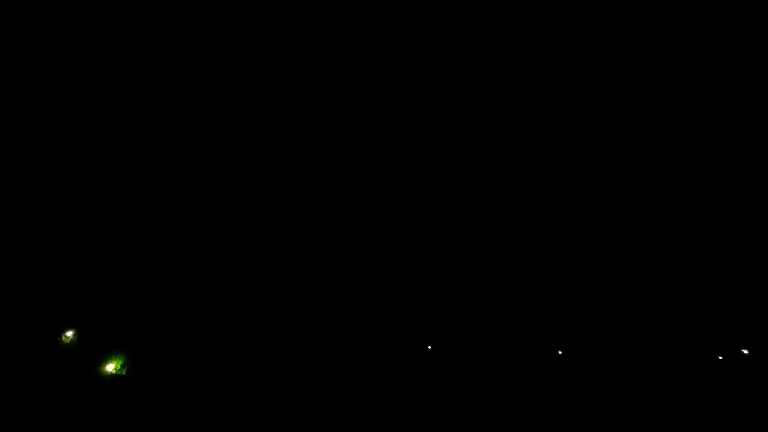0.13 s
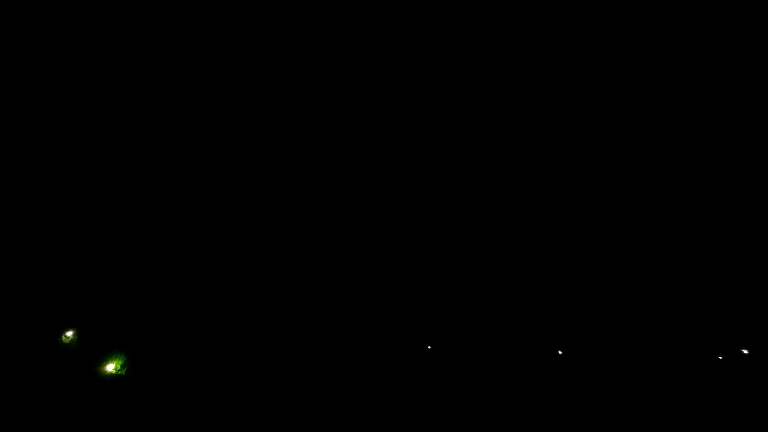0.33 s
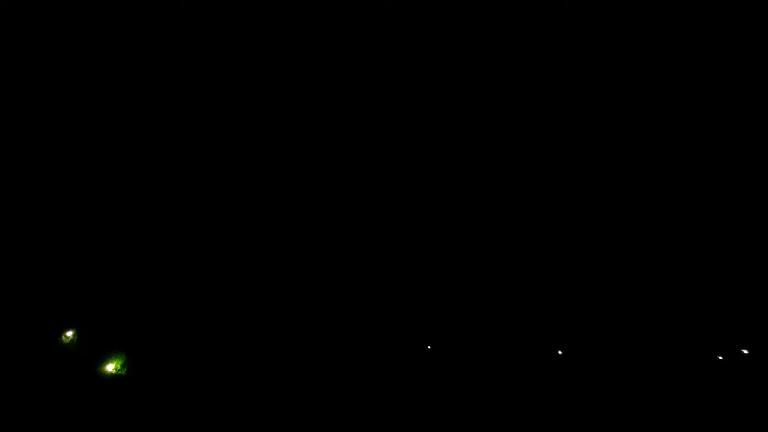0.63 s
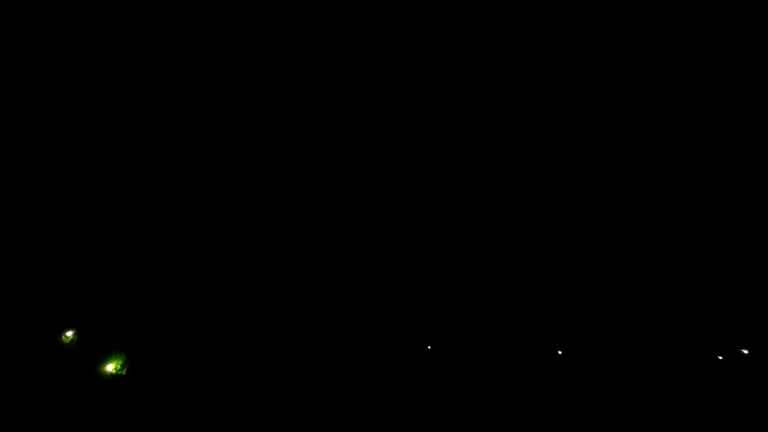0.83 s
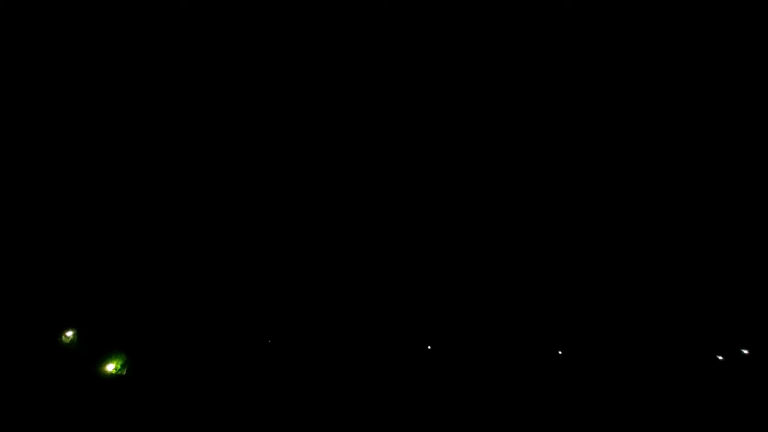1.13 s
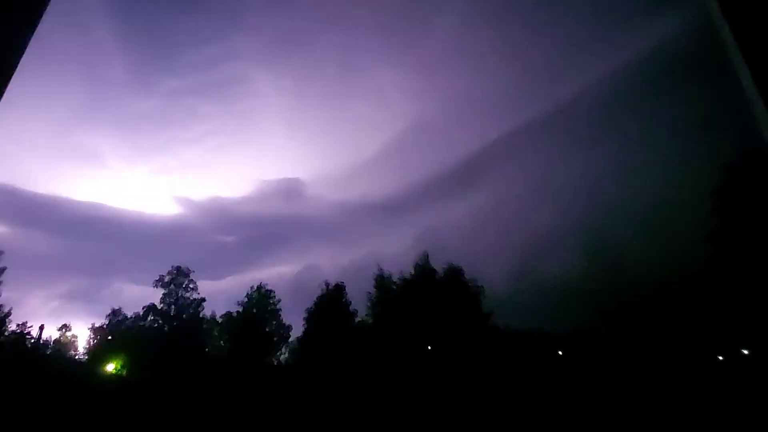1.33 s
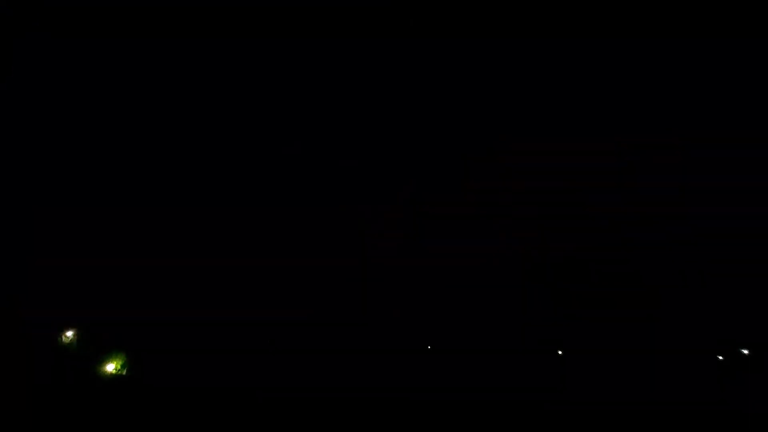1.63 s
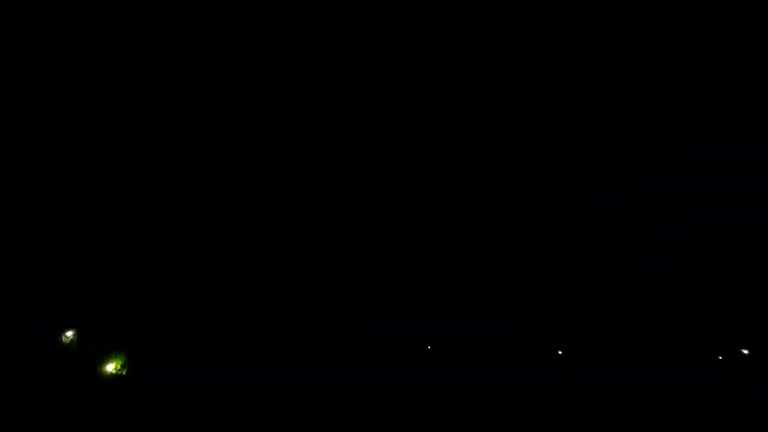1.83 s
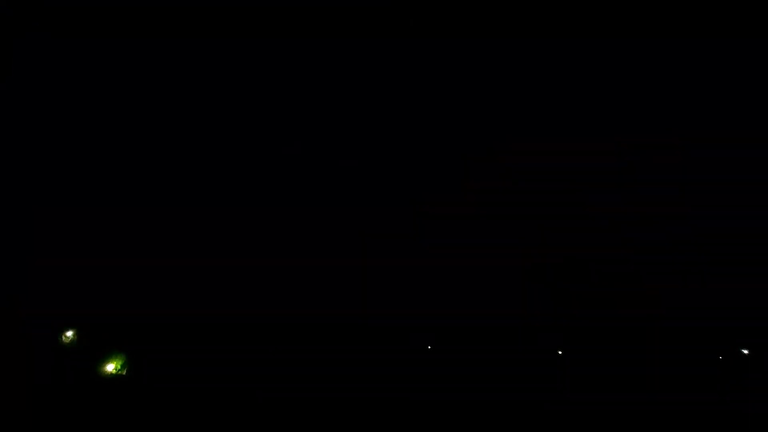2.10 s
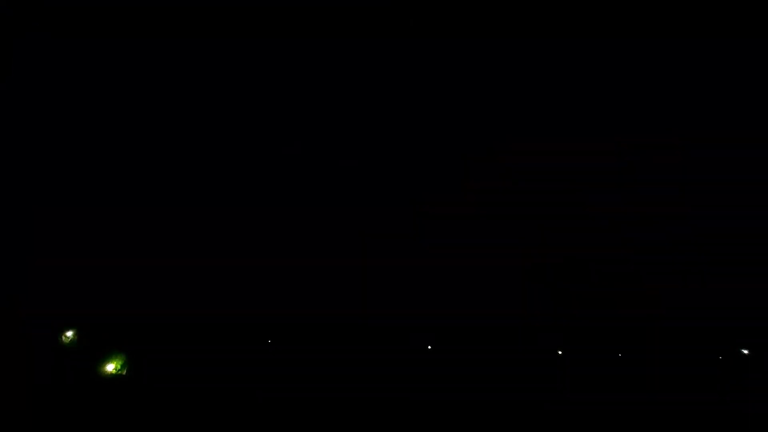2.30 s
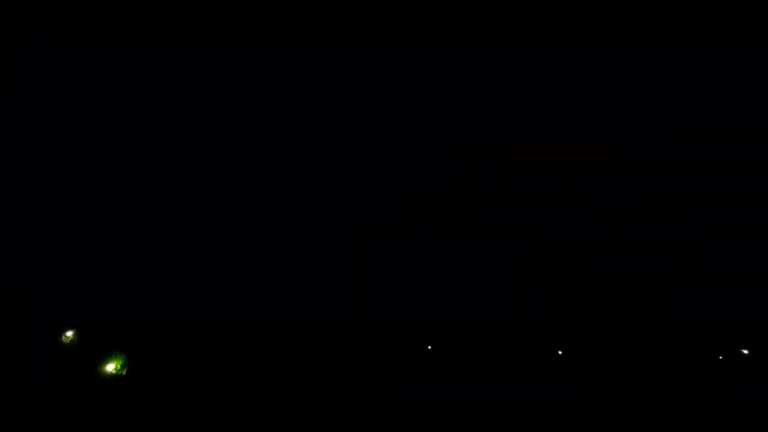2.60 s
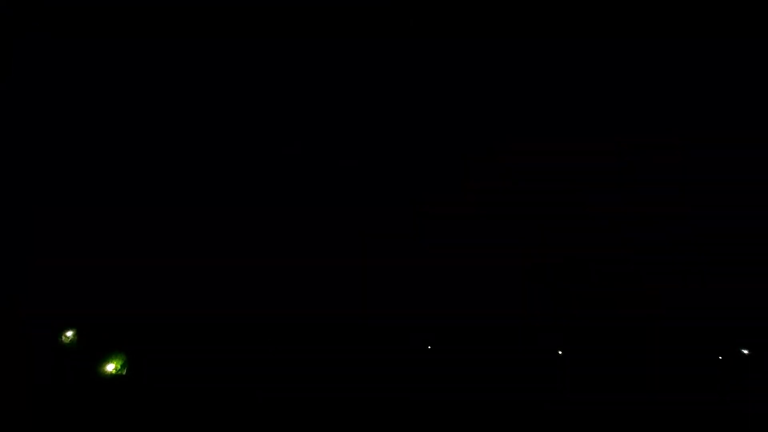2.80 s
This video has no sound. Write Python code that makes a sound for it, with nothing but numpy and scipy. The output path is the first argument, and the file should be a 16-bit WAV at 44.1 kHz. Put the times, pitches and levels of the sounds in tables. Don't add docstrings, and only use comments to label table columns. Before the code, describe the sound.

Loud low thunder rumbling and thudding in uneven bursts outdoors at night, with faint distant rain

```python
import sys
import numpy as np
from scipy import signal
from scipy.fft import rfft, irfft, next_fast_len
from scipy.io import wavfile
from scipy.ndimage import uniform_filter1d

SR = 44100
rng = np.random.default_rng(int(sys.argv[2]) if len(sys.argv) > 2 else 0)


def makeup_ratio(level_db):
    decades = np.asarray(level_db, float) / 20
    return 10 ** decades


def unload_wav(signal):
    wavfile.write(
        sys.argv[1],
        SR,
        np.round(np.clip(np.atleast_2d(signal).T, -1, 1) * 32767).astype(np.int16),
    )


N = 130095
T_S = np.arange(N) / SR
PAD = next_fast_len(N + SR)
HZ = np.arange(PAD // 2 + 1) * SR / PAD + 1e-3

# [start_s, long_db, short_re_long_db, deep_re_long_db]
ROLL_ROWS = [(0.0, -49.5, 11.5, -8.5), (0.12, -30, 2.5, 1.5), (0.27, -29.5, 6.5, -9.5), (0.38, -29, 7, 3.5),
             (0.72, -23.5, 0.5, 1), (1.17, -26, -1, -17.5), (1.28, -29.5, -4.5, -14.5),
             (1.54, -33.5, 3.5, -5.5), (1.81, -28, -5, -27), (2.32, -25, -7, -10), (2.95, -31.5, -1, 0.5)]
# [start_s, peak_db, short_share_db, deep_share_db]
CLAP_ROWS = [(0.059, -25.5, -11, -13.5), (0.124, -18.5, -0.5, -14), (0.202, -10.5, -10.5, -13.5),
             (0.316, -13, -3, -15), (0.369, -18.5, -17.5, -19), (0.452, -24, 4, -15.5),
             (0.543, -1, -1.5, -35.5), (0.702, 3, -4.5, -23), (0.816, -1, -11, -14.5),
             (0.869, -7.5, -18.5, -15), (0.946, -8.5, -16, -27), (1.003, -11, -8, -33.5),
             (1.129, -14.5, -17, -19.5), (1.207, -18, -5.5, -23), (1.274, -19.5, 0.5, -22.5),
             (1.587, -3.5, -9, -19.5), (1.607, -1, -7.5, -29.5), (1.806, -7, -27, -28.5),
             (1.842, -9, -31.5, -26.5), (1.943, -11, -13, -20), (1.99, -6, -8, -26), (2.105, 0, -10, -24.5),
             (2.244, -12, -15, -18.5), (2.297, -17.5, -19.5, -20), (2.384, -5.5, -27, -21),
             (2.672, -11.5, -7.5, -25), (2.737, -15, -5.5, -27.5), (2.873, -14, -18.5, -32),
             (2.914, -11.5, -24, -20.5)]
# [start_s, peak_db, short_share_db, deep_share_db]
PEAL_ROWS = [(0.604, -5, 2, -12), (0.634, -8.5, 1.5, -17), (0.721, -2.5, -13.5, -23),
             (1.624, -10.5, -20.5, -11), (1.678, -6, -11.5, -22.5), (1.724, -12, -9.5, -23.5),
             (2.012, 0.5, -21, -24), (2.044, -15.5, -19, -29.5), (2.129, -5, -21, -20),
             (2.409, -12.5, -10, -19), (2.476, -8.5, -24.5, -23)]
# [freq_hz, density_db]
LONG_COLOUR = [(30, -61), (80, -16.5), (120, -6), (180, -3.5), (235, -4.5), (330, -31), (600, -50.5),
               (3000, -130)]
# [freq_hz, density_db]
SHORT_COLOUR = [(150, -31.5), (235, -21.5), (275, -4.5), (325, 0), (390, -11.5), (450, -24.5), (700, -42.5),
                (3000, -130)]
# [freq_hz, density_db]
DEEP_COLOUR = [(15, -19), (30, -8.5), (60, -5.5), (95, 4.5), (125, 11), (170, -35), (400, -72),
               (2000, -140)]
# [pitch_hz, width_hz, gain_db]
PORCH_MODES = [(85.2, 11, -5.5), (135, 5.3, 4), (155, 6.7, 9.5), (190.6, 5.7, 10.5), (285.8, 6.5, 10),
               (323.5, 5.3, 9), (373.3, 14, 6), (501, 12, 6), (618.7, 30, 3.5), (788, 13, 3.5),
               (995, 32, 6.5)]
# [freq_hz, level_db]
SCATTER_COLOUR = [(30, -12.5), (110, -52), (250, -17.5), (600, -0.5), (1300, -1.5), (3000, 9)]
# [freq_hz, density_db]
CRACKLE_COLOUR = [(250, -39), (420, -0.5), (520, 0), (700, -3), (900, -11), (1200, -22.5), (1600, -48),
                  (5000, -100)]
# [freq_hz, density_db]
EDGE_COLOUR = [(500, -43.5), (1000, -5), (1500, 1.5), (2000, -9), (2500, -20), (3200, -30.5), (8000, -83.5)]
# [time_s, gain_db]
NEARNESS_DB = [(0, -7.5), (.1, 1), (.25, 1.5), (.5, 3), (.65, 2.5), (.8, 0.5), (.95, -3), (1.3, -2),
               (1.47, 2), (1.62, -0.5), (1.85, -3), (2.05, -0.5), (2.3, -1), (2.5, -2), (2.95, -4.5)]
# [freq_hz, density_db]
RAIN_COLOUR = [(1500, -20), (2400, -3.5), (3300, -2.5), (4400, -1), (8800, -5), (9600, -8.5), (12300, -10),
               (15500, -14.5)]
# [freq_hz, density_db]
ROAR_COLOUR = [(71, -53), (120, -14), (327, 1), (452, -12), (1190, -15.5), (1280, -17.5), (2600, -38.5),
               (3380, -54.5), (5720, -120)]
# [time_s, gain_db]
AUTO_GAIN = [(0, 0.8), (.1, 3), (.3, 4.4), (.53, 4.2), (.6, 1.5), (.7, -2), (1.45, -1), (1.62, -3.5),
             (1.95, -1.5), (2.1, -2), (2.95, -2.5)]

ATTACK_S, RELEASE_S, CLAP_HOLD_S, PEAL_HOLD_S = 0.012, 0.012, 0.014, 0.045
STROKE_TRIM_DB, SHORT_TRIM_DB, DEEP_TRIM_DB = -8, 3, 8
WAVES_PER_S, WAVE_SPREAD_DB = 500, 1.02
EVENING_S, EVENING = 0.0286, 0.61
LEAD_DELAY_S, LEAD_DB, LEAD_CRACKLE_DB = 0.006953, 26.5, 26
SCATTER_S, RIGHT_LAG_S, LEFT_DB = 0.049, 0.00038, -0.78
CRACKLE_DB, CRACKLE_SMEAR_S, CRACKLE_FOLLOWS, CRACKLE_SHARED = -25, 0.014, 0.62, 0.9
EDGE_DB, EDGE_FOLLOWS, EDGE_NEARNESS = -45.5, 0.35, 2
RAIN_DB, PATCHY_DB, DROPS_PER_S, DROPS_DB = -56.5, 0.3, 1200, -19
INSECT_HZ, INSECT_WIDTH_HZ, INSECT_DB = 3086, 100, -68
INSECT_FADE_DB_PER_S, INSECT_THROB_DB = 1.8, 0.7
ROAR_DB = -51


def rms_one(x):
    return x / np.sqrt(np.mean(x ** 2) + 1e-20)


def curve(points):
    return np.interp(T_S, *np.transpose(points))


def colour(points):
    hz, db = np.transpose(points)
    return makeup_ratio(np.interp(np.log(HZ), np.log(hz), db))


def shaped(x, response):
    return irfft(rfft(x, PAD) * response, PAD)[..., :N]


def clicks(rate_per_s, spread_db):
    sizes = makeup_ratio(spread_db * np.minimum(rng.exponential(1, N), 4))
    sizes = sizes * rng.choice([-1, 1], N)
    return sizes * (rng.random(N) < rate_per_s / SR)


def evened(x):
    power = uniform_filter1d(rms_one(x) ** 2, int(EVENING_S * SR)) + 0.13
    return rms_one(x / power ** (EVENING / 2))


def drift(rate_hz):
    r = np.exp(-2 * np.pi * rate_hz * 40 / SR)
    noise = rng.standard_normal(N // 40 + 2002)
    slow = signal.lfilter([1], [1, -2 * r, r * r], noise)[2000:]
    return np.interp(np.arange(N) / 40, np.arange(len(slow)), rms_one(slow))


def wave_strength():
    start_s, level_db, short_db, deep_db = np.transpose(ROLL_ROWS)
    power = np.array([makeup_ratio(2 * np.interp(T_S, start_s, level_db + share_db))
                      for share_db in (0, short_db, deep_db)])
    for rows, hold_s in ((CLAP_ROWS, CLAP_HOLD_S), (PEAL_ROWS, PEAL_HOLD_S)):
        for start_s, peak_db, short_db, deep_db in rows:
            age_s = T_S - start_s
            rise = np.sin(np.pi / 2 * np.clip(age_s / ATTACK_S + 0.5, 0, 1)) ** 4
            fall = np.exp(-2 * np.clip(age_s - hold_s, 0, 1) / RELEASE_S)
            short = makeup_ratio(2 * (short_db + SHORT_TRIM_DB))
            deep = makeup_ratio(2 * (deep_db + DEEP_TRIM_DB))
            shares = np.array([[max(1 - short - deep, 0.1)], [short], [deep]])
            power += makeup_ratio(2 * (peak_db + STROKE_TRIM_DB)) * shares * rise * fall
    return np.sqrt(power)


def lead_shocks(level_db):
    start_s = np.array([row[0] for row in CLAP_ROWS + PEAL_ROWS])
    shocks = np.zeros(N)
    at = ((start_s + LEAD_DELAY_S) * SR).astype(int)
    shocks[at] = makeup_ratio(level_db) * rng.choice([-1, 1], len(start_s))
    return shocks


def porch_response():
    hollows = 1 + sum((makeup_ratio(gain_db) - 1) / (1 + 2j * (HZ - pitch_hz) / width_hz)
                      for pitch_hz, width_hz, gain_db in PORCH_MODES)
    left = makeup_ratio(LEFT_DB) * np.ones_like(HZ)
    right = np.exp(-2j * np.pi * HZ * RIGHT_LAG_S)
    return hollows, np.array([left, right])


def thunder():
    train = rms_one(clicks(WAVES_PER_S, WAVE_SPREAD_DB)) + lead_shocks(LEAD_DB)
    hollows, paths = porch_response()
    waves = np.zeros(N)
    for strength, points in zip(wave_strength(), (LONG_COLOUR, SHORT_COLOUR, DEEP_COLOUR)):
        waves += strength * evened(shaped(train, colour(points)))
    tail = rng.standard_normal((2, N)) * np.exp(-T_S / SCATTER_S)
    echoes = rfft(rms_one(tail) / np.sqrt(N), PAD)
    return makeup_ratio(-7.5) * shaped(waves, hollows * (paths + colour(SCATTER_COLOUR) * echoes))


def crackle():
    long, short, _ = wave_strength()
    hollows, paths = porch_response()
    near_db = curve(NEARNESS_DB)
    r = np.exp(-1 / (CRACKLE_SMEAR_S * SR))
    smeared = np.sqrt(signal.lfilter([1 - r], [1, -r], short ** 2 + 0.31 * long ** 2))
    shared = rms_one(clicks(1200, 3.4)) + lead_shocks(LEAD_CRACKLE_DB)
    fronts = CRACKLE_SHARED * shared + 0.5 * rng.standard_normal((2, N))
    body = rms_one(shaped(fronts, colour(CRACKLE_COLOUR)))
    body = makeup_ratio(CRACKLE_DB + near_db) * smeared ** CRACKLE_FOLLOWS * body
    edge = rms_one(shaped(fronts, colour(EDGE_COLOUR)))
    edge = makeup_ratio(EDGE_DB + EDGE_NEARNESS * near_db) * smeared ** EDGE_FOLLOWS * edge
    return shaped(body + edge, hollows * paths)


def rain():
    drops = np.array([rms_one(clicks(DROPS_PER_S, 9.0)) for _ in range(2)])
    hiss = rng.standard_normal((2, N)) + makeup_ratio(DROPS_DB) * drops
    level_db = RAIN_DB + PATCHY_DB * drift(23.3)
    return makeup_ratio(level_db) * rms_one(shaped(hiss, colour(RAIN_COLOUR)))


def roar():
    noise = rng.standard_normal((3, N))
    return makeup_ratio(ROAR_DB) * rms_one(shaped(noise[0] + 0.22 * noise[1:], colour(ROAR_COLOUR)))


def insect():
    band = 1 / (1 + (2 * (HZ - INSECT_HZ) / INSECT_WIDTH_HZ) ** 2)
    trill = shaped(rng.standard_normal((2, N)), band)
    level_db = INSECT_DB - INSECT_FADE_DB_PER_S * T_S + INSECT_THROB_DB * drift(2.7)
    return makeup_ratio(level_db) * np.array([evened(side) for side in trill])


def auto_gain():
    return makeup_ratio(curve(AUTO_GAIN))


def scene():
    return thunder() + crackle() + auto_gain() * (rain() + insect() + roar())


def roll_off(x):
    return signal.sosfilt(signal.butter(12, 15740, fs=SR, output="sos"), x)


def record(dry):
    rounded = 1.8 * np.tanh(dry / 1.8)
    top_cut = signal.cheby2(16, 60, 16240, fs=SR, output="sos")
    mix = signal.sosfilt(top_cut, rounded)
    return roll_off(mix)


dry = scene()
out = record(dry)
unload_wav(out)
```